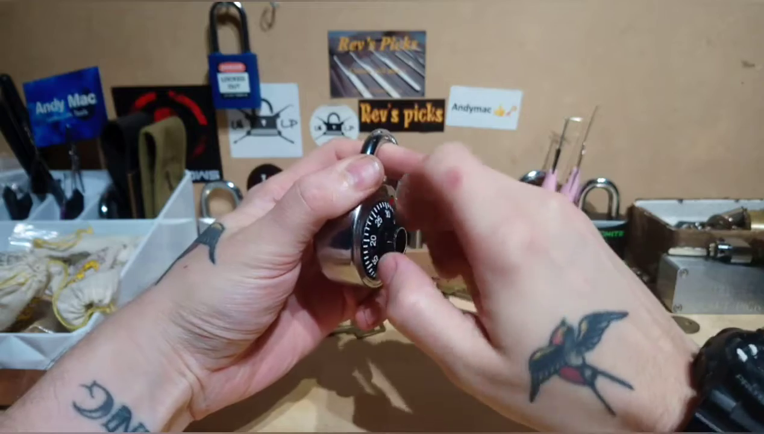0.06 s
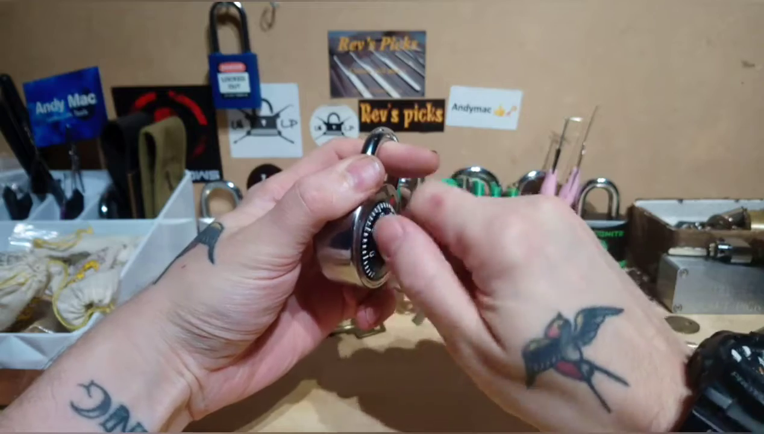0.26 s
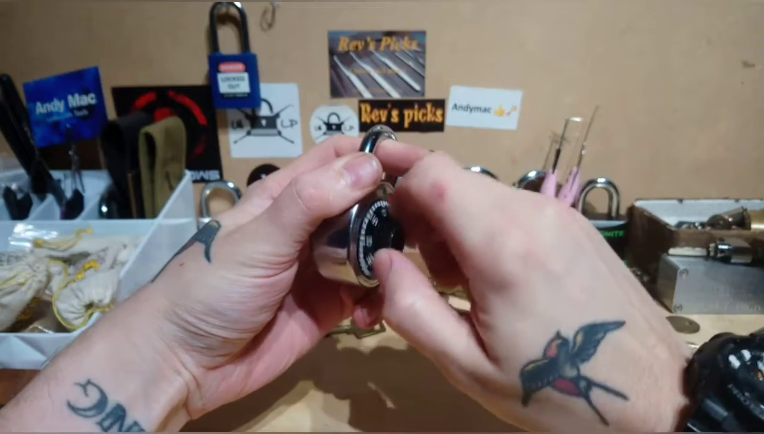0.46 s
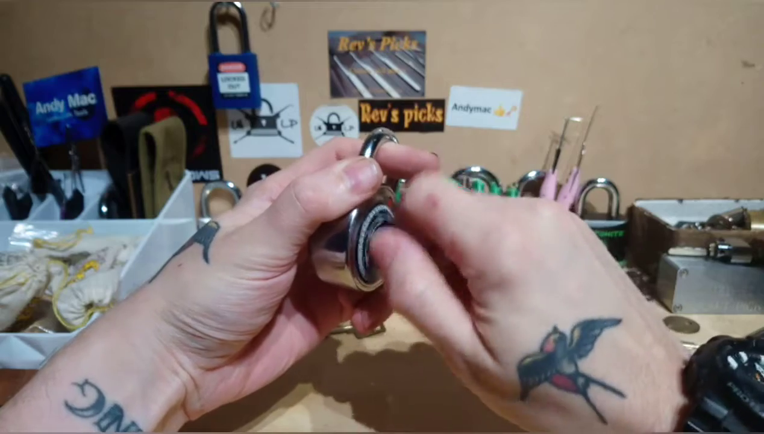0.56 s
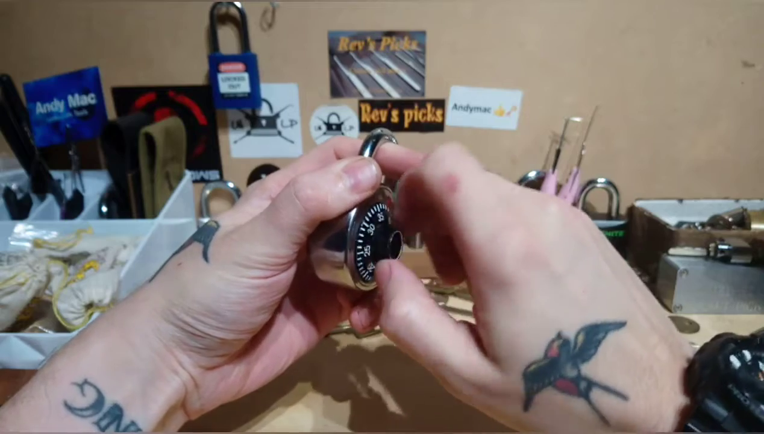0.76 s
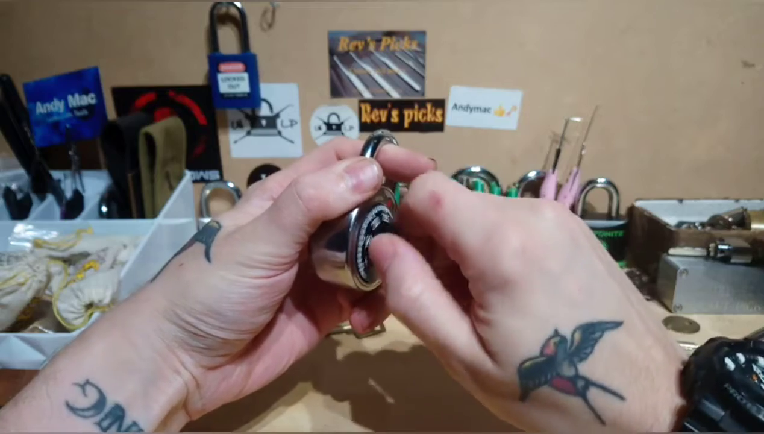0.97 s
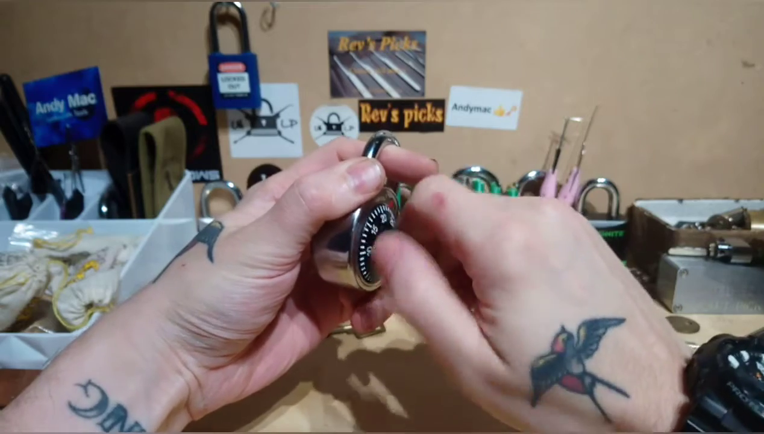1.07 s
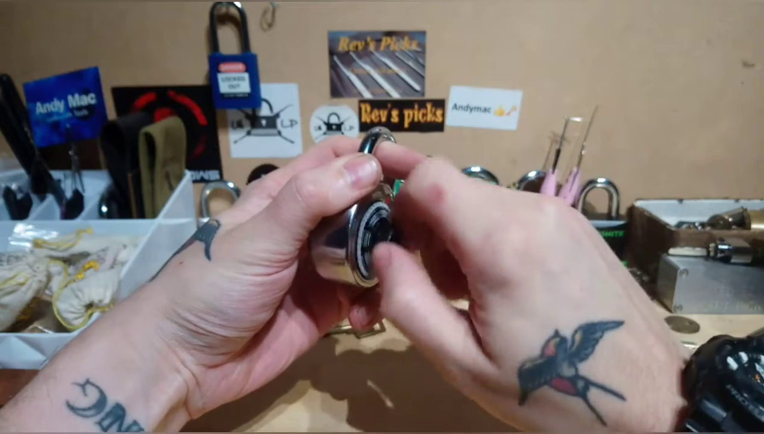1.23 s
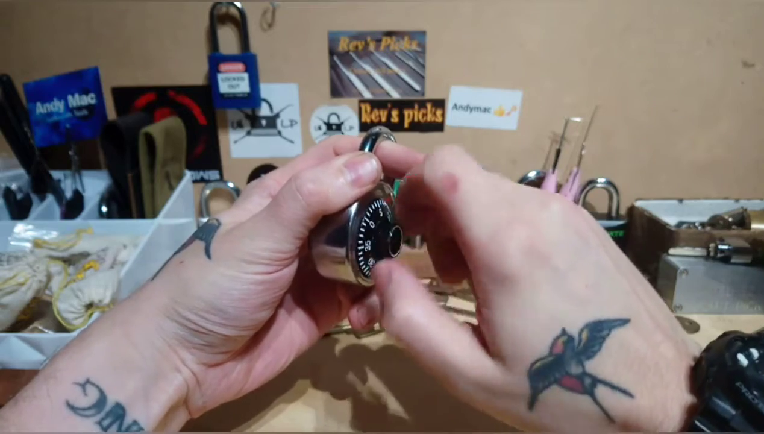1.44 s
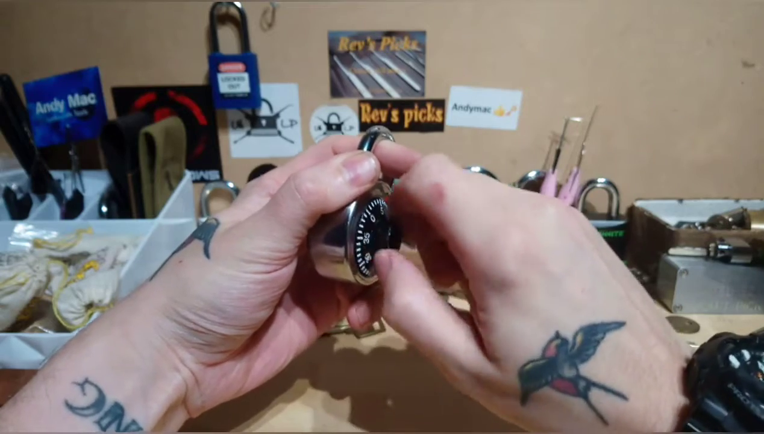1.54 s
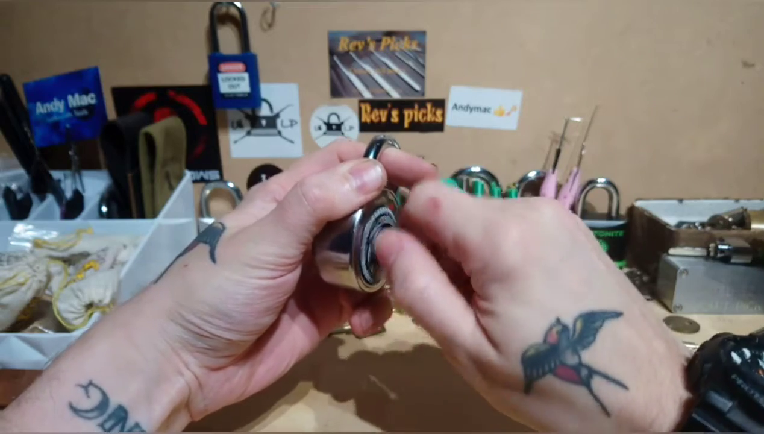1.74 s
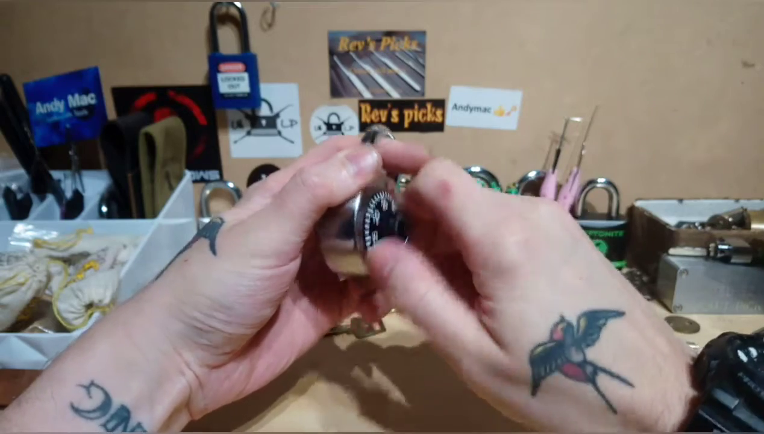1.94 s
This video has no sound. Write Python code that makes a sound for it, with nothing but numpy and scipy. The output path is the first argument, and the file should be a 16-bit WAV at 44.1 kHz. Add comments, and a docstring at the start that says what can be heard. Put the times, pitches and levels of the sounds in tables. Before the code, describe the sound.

A combination padlock dial being turned, with small irregular metal clicks and soft rubbing.

```python
"""A workbench in a small room, a hand-held combination padlock a little right of the microphones.
Its dial is turned in short pushes and rubs softly as it goes. Each catch of the wheels is a tiny
chatter of metal that knocks the hollow case and sets the steel parts ringing.
The room answers with a short tail; faint hiss and hum lie underneath."""
import sys
import numpy as np
from scipy import signal
from scipy.fft import rfft, irfft
from scipy.io import wavfile

SR = 44100
rng = np.random.default_rng(int(sys.argv[2]) if len(sys.argv) > 2 else 0)


def pcm_store(signal):
    """Save signal as 16-bit PCM."""
    levels = np.round(np.clip(np.atleast_2d(signal), -1, 1) * 32767)
    wavfile.write(sys.argv[1], SR, levels.astype(np.int16).T)


N = 88200
T = np.arange(N) / SR

# Colour of the steady hiss. Each row: frequency in Hz, relative level in dB.
HISS_COLOUR = [(25, -8), (60, -3.5), (130, -2.5), (250, -6.5), (550, -7), (900, -10), (1200, -2),
               (2500, -11.5), (4800, -2.5), (6800, -12), (8300, -28.5), (9800, -38), (10450, -9.5),
               (11400, -39.5), (13500, -34.5), (15100, -14), (16000, -40)]
# How the hiss leans to the right. Each row: frequency in Hz, right over left in dB.
HISS_LEAN = [(40, 4), (200, 2.5), (5000, 1), (7500, 3.5), (10500, 14), (15000, 4)]
# Rubs of the dial. Each row: start in seconds, length in seconds, resonance in Hz,
# then the levels of resonance, midrange and treble in dB.
DIAL_RUBS = [(0.062, 0.048, 5200, -56, -66, -54), (0.169, 0.17, 897, -52.5, -54.5, -60.5),
             (0.438, 0.01, 732, -49, -59, -57), (0.571, 0.046, 5040, -45, -45, -46.5),
             (0.634, 0.028, 2280, -34, -39, -65), (0.933, 0.045, 1880, -48, -60, -69),
             (0.947, 0.13, 1970, -65, -64, -69.5), (1.29, 0.1, 950, -54.5, -54, -65),
             (1.402, 0.096, 1340, -80, -62.5, -67.5), (1.51, 0.055, 960, -63, -78, -68),
             (1.635, 0.033, 920, -53.5, -68, -55), (1.671, 0.031, 2270, -39, -60, -47),
             (1.764, 0.1, 939, -53, -54, -58), (1.94, 0.15, 1262, -57, -56, -68.5)]
# Colour of metal touching metal. Each row: frequency in Hz, relative level in dB.
CONTACT_COLOUR = [(700, -23.5), (1100, -13.5), (1650, -4.5), (2050, 2), (2450, -10), (2800, -0.5),
                  (3300, -5), (3850, 1.5), (4200, 2.5), (4900, 4.5), (5900, -3.5), (6800, -3), (7900, -27),
                  (11000, -62)]
# Catches of the wheels. Each row: start in seconds, relative levels of treble, knock and midrange
# in dB, knock pitch in Hz, ping pitch in Hz, chatter decay in ms, then trims in dB for the low ring,
# the high ring and the ping.
CATCHES = [ (0.068, -25.5, -33, -41.5, 881, 4494, 2.3, -2, -2.5, 5),
           (0.1276, -40.5, -57, -74, 955, 4230, 1.7, 0, -1, 8),
           (0.153, -52, -61, -44.5, 920, 2850, 1.8, -2, 14, -10),
           (0.2044, -32, -43, -40.5, 837, 2870, 3.05, 4, 0, 4),
           (0.2703, -44, -46, -50.5, 944, 4900, 1.3, -1.5, 10, 9),
           (0.3028, -44.5, -67, -42, 935, 3000, 2.7, -15, -1, 19),
           (0.4433, -33, -37.5, -42, 819, 6600, 4.15, -15, -17, -6),
           (0.4783, -35.5, -63, -56, 835, 6900, 3.3, 1, 3, -6),
           (0.4988, -21.5, -39.5, -31, 904, 4780, 1.82, -17.5, -5, 5.5),
           (0.5342, -54, -49, -46, 960, 4670, 1.6, -7, -1, -4),
           (0.5799, -16.5, -44.5, -34.5, 860, 4800, 2.1, -27, -4, 6.5),
           (0.5914, -39, -43, -59, 940, 5270, 1.7, -6, 12, 20),
           (0.6212, -20.5, -41, -26.5, 856, 6990, 3.23, -9, -19, -1),
           (0.6597, -46, -44.5, -57, 910, 4600, 4.5, -7, -22, -5),
           (0.712, -63, -47, -47.5, 938, 4300, 3.7, -6, -5, -2),
           (0.816, -30, -40, -57, 842, 6560, 2.5, -5, -3, -16),
           (0.8666, -40, -49, -48, 916, 6850, 3.6, 1.5, -10, 0),
           (0.8778, -33.5, -56, -42.5, 806, 3680, 2.6, -5, -3, 9.5),
           (0.9084, -36.5, -50.5, -45, 895, 6860, 0.87, -7, -3, 3.5),
           (1.0343, -41, -54, -44.5, 984, 1965, 2.1, -3.5, 5, 13),
           (1.1100, -38, -48.5, -51, 904, 3300, 4.3, -18, 6, 17),
           (1.1335, -45, -46.5, -62, 936, 3350, 2.4, -7, -15, -19),
           (1.2364, -27, -40, -48, 801, 4570, 6.2, -27, -6, 5),
           (1.2469, -28, -46, -36.5, 870, 4820, 2, -8.5, 0, 11),
           (1.2736, -34.5, -42.5, -44.5, 920, 4740, 5, -19, -4, 6.5),
           (1.3312, -41, -46.5, -49.5, 940, 3690, 2.2, -1.5, -27, 13.5),
           (1.5308, -26, -40, -45.5, 920, 4050, 3.7, 6, 6, 6),
           (1.5430, -28.5, -46, -48, 733, 5050, 10.2, -10, 5, -1),
           (1.5501, -20.5, -38, -31, 985, 5350, 0.9, -37, 0, 5.5),
           (1.5525, -21, -42, -31.5, 966, 4130, 1.3, -1, -19, -16),
           (1.5662, -46, -76, -68, 900, 2010, 1.9, -3, -6, -11),
           (1.6664, -23, -33.5, -26, 950, 4103, 2.26, -3, -7, 3),
           (1.6691, -34.5, -40.5, -36.5, 918, 2950, 4.7, 4, -11, 12.5),
           (1.9246, -53.5, -49, -51, 916, 4700, 2.7, -11, 6, 3),
           (1.9642, -43.5, -52, -77, 830, 4230, 1.5, -11, -10, 10),
           (1.9894, -62, -52, -67, 877, 4030, 2.4, -7, -6, -6)]
# Colour of the snap that comes with each catch. Each row: frequency in Hz, relative level in dB.
SNAP_COLOUR = [(5500, -22), (6900, -3.5), (7900, -18), (8700, 0), (9700, -23), (11000, -9.5), (13000, -54),
               (15200, -4), (16000, -24)]
# Modes of the steel parts. Each row: frequency in Hz, relative level in dB, seconds to fall 60 dB.
STEEL_MODES = [(1380, -7, 0.11), (1927, -1, 0.13), (2000, -1, 0.12), (2080, 0, 0.12), (2215, 1, 0.11),
               (2800, 3, 0.07), (3690, -2, 0.08), (4085, 3, 0.1), (4215, 3, 0.08), (4755, 3, 0.09),
               (4880, 4, 0.09), (5015, 6, 0.1), (5365, -2, 0.09), (6740, -5, .11)]
# How the lock leans to the right microphone. Each row: frequency in Hz, right over left in dB.
LOCK_LEAN = [(800, 3), (1300, -0.5), (2000, -2.5), (3000, 5), (4200, -1), (5500, 1.5), (6800, 16),
             (8500, 20), (15000, 14.5)]

HISS_DB, HISS_ALIKE_BELOW_HZ, HUM_HZ, HUM_DB = -60, 1100, 98.5, -80
SLIPS_PER_S, SLIP_SPREAD_DB, RUB_WIDTH_OCTAVES = 2900, 2.5, 0.16
CROSSOVER_HZ, CONTACT_ALIKE = 3410, 0.51
TREBLE_TRIM_DB, MID_TRIM_DB, KNOCK_TRIM_DB = -3, 8.5, 4.5
CONTACT_RISE_S, FIRM_DB, SOFT_SLOWING = 0.00063, -22.5, 0.2   # weaker catches scrape in more slowly
PING_DECAY_S = 0.0015
SNAP_TRIM_DB, SHIMMER_HZ, SHIMMER_DB, SHIMMER_T60_S = 5, 15200, -24, 0.12
RATTLE_HZ, RATTLE_SHARE = 45, 0.75
LOW_RING_TRIM_DB, HIGH_RING_TRIM_DB = -6.5, -20.5
GRIP_DETUNE, MODE_SCATTER_DB, PHASE_SPREAD_RAD = 0.0047, 3, 1
BODY_RISE_S, CASE_HZ, CASE_DB, CASE_T60_S = 0.0035, 953.4, -11, 0.17
ROOM_T60_S, ROOM_ONSET_S = 0.27, 0.00067
STEEL_LAG_S, CASE_LAG_S = 0.00019, 0.00013
LOW_CUT_HZ, TOP_CUT_HZ = 648, 15950


def from_db(db):
    """Decibels to gain."""
    return 10 ** (np.asarray(db) / 20)


def rms_one(x):
    """Scale to rms 1."""
    return x / np.sqrt(np.mean(x ** 2) + 1e-20)


def colour(x, points, share=1):
    """Apply a smooth (Hz, dB) curve, or a share of it."""
    size = 2 * x.shape[-1]
    hz, db = np.transpose(points)
    curve = np.interp(np.log(np.fft.rfftfreq(size, 1 / SR) + 1), np.log(hz), db)
    return irfft(rfft(x, size) * from_db(share * curve), size)[..., :size // 2]


def band(x, hz, kind, order=2):
    """Butterworth filter."""
    return signal.sosfilt(signal.butter(order, hz, kind, fs=SR, output="sos"), x + 1e-18)


def add(out, start_s, x):
    """Mix x in from start_s on."""
    i = int(start_s * SR)
    out[..., i:i + x.shape[-1]] += x[..., :max(N - i, 0)]


def stereo_noise(alike, size):
    """White noise with the share `alike` of its power common to both sides."""
    shared, *own = rng.standard_normal((3, size))
    return np.sqrt(alike) * shared + np.sqrt(1 - alike) * np.array(own)


def lean_right(pair, lean):
    """Share most of a right-over-left curve between the two sides."""
    return np.array([colour(pair[0], lean, -0.41), colour(pair[1], lean, 0.54)])


def left_later(pair, lag_s):
    """Sound reaches the left microphone later."""
    return np.array([np.interp(T - lag_s, T, pair[0]), pair[1]])


def hiss_and_hum():
    """The bed: steady hiss, partly alike on both sides in the bass, and a faint hum."""
    lows = band(stereo_noise(0.21, N), HISS_ALIKE_BELOW_HZ, "low")
    highs = band(stereo_noise(0, N), HISS_ALIKE_BELOW_HZ, "high")
    hiss = lean_right(colour(lows + highs, HISS_COLOUR), HISS_LEAN)
    hum = np.sin(2 * np.pi * HUM_HZ * T)
    return from_db(HISS_DB) * rms_one(hiss) + from_db(HUM_DB) * rms_one(hum)


def metal_contact(force):
    """Metal on metal colours a force; returns midrange and treble, each at rms 1."""
    contact = colour(force, CONTACT_COLOUR)
    return [rms_one(band(contact, CROSSOVER_HZ, side, order=4)) for side in ("low", "high")]


def dial_rubs():
    """Fine slips of the turning dial excite the metal and one resonance, swelling quickly and fading."""
    slips = rng.random(N) < SLIPS_PER_S / SR
    strength = from_db(SLIP_SPREAD_DB * rng.standard_normal(N).clip(-2, 2))
    grains = slips * strength * stereo_noise(CONTACT_ALIKE, N)
    mid, treble = metal_contact(grains)
    steel, hollow = np.zeros((2, N)), np.zeros(N)
    for start_s, length_s, hz, resonance_db, mid_db, treble_db in DIAL_RUBS:
        swell = np.sin(np.pi * np.clip((T - start_s) / length_s, 0, 1) ** 0.74)
        steel += swell * (from_db(mid_db) * mid + from_db(treble_db) * treble)
        edges_hz = hz * 2 ** (RUB_WIDTH_OCTAVES * np.array([-.5, .5]))
        hollow += swell * from_db(resonance_db) * rms_one(band(grains[0], edges_hz, "band"))
    return steel, hollow


def chatter(fade, mid_db, treble_db):
    """A wheel chatters as it catches: a dying burst of contact noise."""
    mid, treble = metal_contact(stereo_noise(CONTACT_ALIKE, len(fade)) * fade)
    return (from_db(mid_db) * mid + from_db(treble_db) * treble) * np.sqrt(np.mean(fade ** 2))


def loose_tone(phase):
    """Loose parts do not ring steadily: a tone whose strength and phase rattle."""
    size = phase.shape[-1]
    a, b = band(rng.standard_normal((2, 2 * size)), RATTLE_HZ, "low")[:, size:]
    rattle = rms_one(a) * np.sin(phase) + rms_one(b) * np.cos(phase)
    return np.sqrt(1 - RATTLE_SHARE) * np.sin(phase) + np.sqrt(RATTLE_SHARE / 2) * rattle


def snap(t, fade):
    """A bright snap with a brief shimmer, growing louder the harder the catch."""
    burst = rms_one(colour(stereo_noise(CONTACT_ALIKE, len(t)), SNAP_COLOUR)) * fade
    shimmer = from_db(SHIMMER_DB - 60 * t / SHIMMER_T60_S) * loose_tone(2 * np.pi * SHIMMER_HZ * t)
    return burst + shimmer


def steel_ring(t, low_db, high_db):
    """The steel parts ring on, detuned by the grip, with a different level and phase on each side."""
    ring = np.zeros((2, len(t)))
    for hz, mode_db, t60_s in STEEL_MODES:
        drive_db = low_db + LOW_RING_TRIM_DB if hz < CROSSOVER_HZ else high_db + HIGH_RING_TRIM_DB
        held_hz = hz * (1 + GRIP_DETUNE * rng.standard_normal())
        phase = 2 * np.pi * (held_hz * t + rng.random())
        side_db = drive_db + mode_db + MODE_SCATTER_DB * rng.standard_normal((2, 1))
        side_phase = phase + PHASE_SPREAD_RAD * rng.standard_normal((2, 1))
        ring += from_db(side_db - 60 * t / t60_s) * loose_tone(side_phase)
    return ring * (1 - np.exp(-t / BODY_RISE_S))


def case_knock(t, hz):
    """The hollow case gives a short thud, then rings at its own pitch."""
    thud = (t / BODY_RISE_S * np.exp(1 - t / BODY_RISE_S)) ** 2 * np.sin(2 * np.pi * hz * t)
    ring = from_db(CASE_DB - 60 * t / CASE_T60_S) * np.sin(2 * np.pi * CASE_HZ * t)
    return thud + ring * (1 - np.exp(-t / BODY_RISE_S))


def wheel_catches():
    """Each catch chatters, pings, snaps, rings the steel and knocks the case; returns steel and knocks."""
    steel, knocks, t = np.zeros((2, N)), np.zeros(N), T[:N // 6]
    for (start_s, treble_db, knock_db, mid_db, knock_hz, ping_hz, chatter_ms,
         low_ring_db, high_ring_db, ping_db) in CATCHES:
        rise_s = CONTACT_RISE_S * from_db(SOFT_SLOWING * (FIRM_DB - treble_db))
        touch = 1 - np.exp(-t / rise_s)
        fade = touch * np.exp(-1000 * t / chatter_ms)
        ping = touch * np.exp(-t / PING_DECAY_S) * rms_one(np.sin(2 * np.pi * ping_hz * t))
        catch = chatter(fade, mid_db + MID_TRIM_DB, treble_db + TREBLE_TRIM_DB)
        catch += from_db(treble_db + TREBLE_TRIM_DB + ping_db) * ping
        catch += from_db(treble_db + mid_db + SNAP_TRIM_DB) * snap(t, fade)   # grows as force squared
        catch += steel_ring(t, mid_db + low_ring_db, treble_db + high_ring_db)
        add(steel, start_s, catch)
        add(knocks, start_s, from_db(knock_db + KNOCK_TRIM_DB) * case_knock(t, knock_hz))
    return steel, knocks


def room(direct, tail_db, alike):
    """The small room puts a diffuse tail behind the direct sound."""
    t = T[:N // 3]
    onset = 1 - np.exp(-(t / ROOM_ONSET_S) ** 2)
    decay = stereo_noise(alike, len(t)) * from_db(-60 * t / ROOM_T60_S) * onset
    tail = signal.fftconvolve(np.atleast_2d(direct), rms_one(decay) / np.sqrt(len(t)), axes=1)
    return direct + from_db(tail_db) * tail[:, :N]


def scene():
    """The lock sits a little to the right: the left microphone hears it later and duller."""
    catch_steel, knocks = wheel_catches()
    rub_steel, hollow = dial_rubs()
    steel = room(catch_steel + rub_steel, tail_db=-6, alike=0.1)
    case = room(knocks + hollow, tail_db=-9, alike=1.0)
    lock = left_later(steel, STEEL_LAG_S) + left_later(case, CASE_LAG_S)
    return lean_right(band(lock, LOW_CUT_HZ, "high", order=6), LOCK_LEAN) + hiss_and_hum()


def record(dry):
    """The very top is cut steeply."""
    return signal.sosfiltfilt(signal.ellip(10, .1, 60, TOP_CUT_HZ, fs=SR, output="sos"), dry)


dry = scene()
out = record(dry)
pcm_store(out)
```